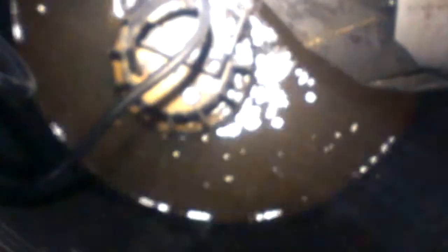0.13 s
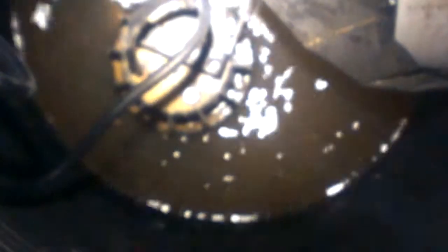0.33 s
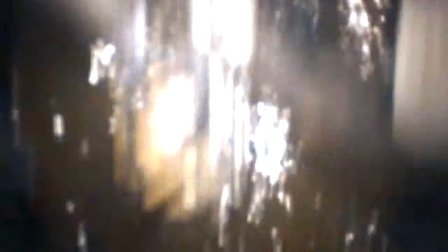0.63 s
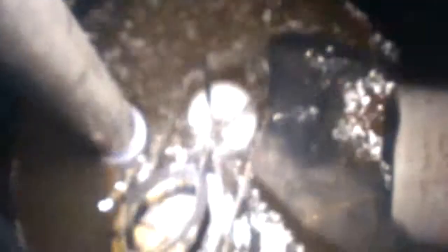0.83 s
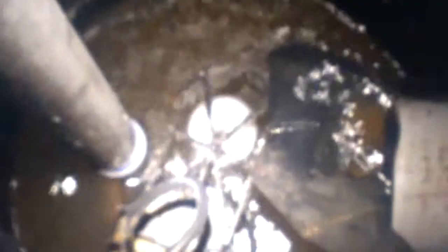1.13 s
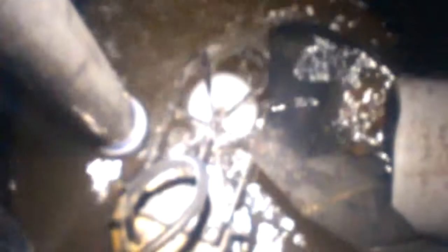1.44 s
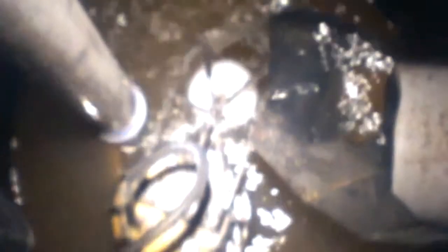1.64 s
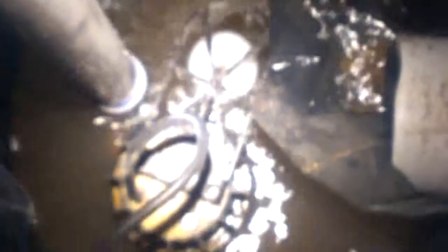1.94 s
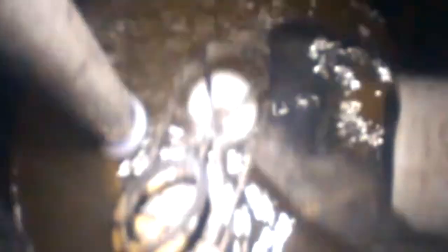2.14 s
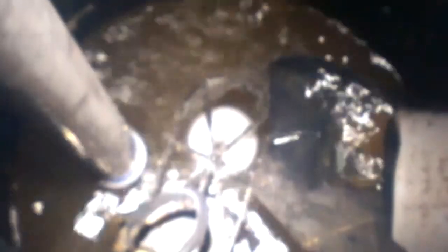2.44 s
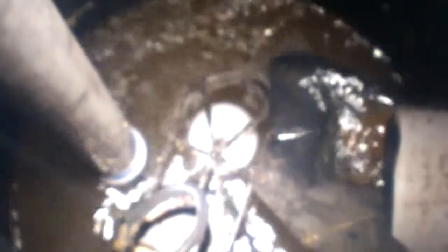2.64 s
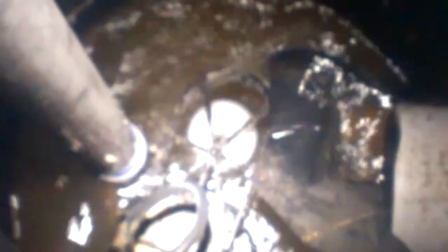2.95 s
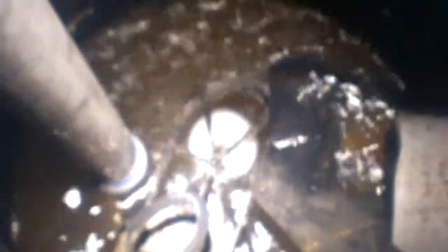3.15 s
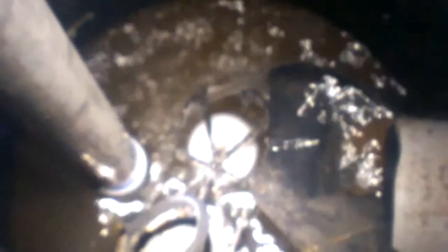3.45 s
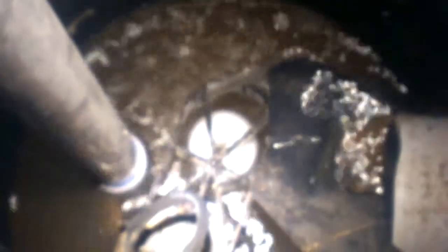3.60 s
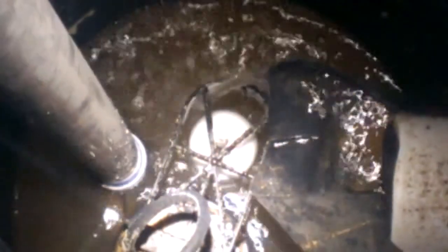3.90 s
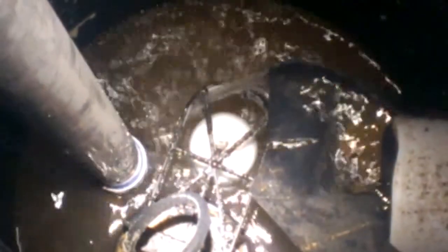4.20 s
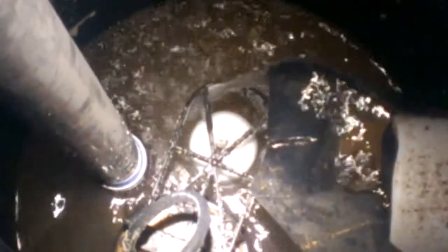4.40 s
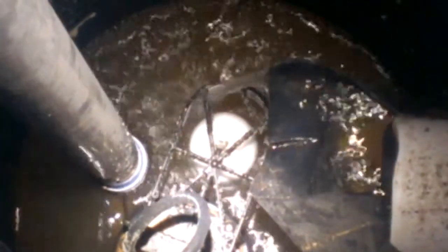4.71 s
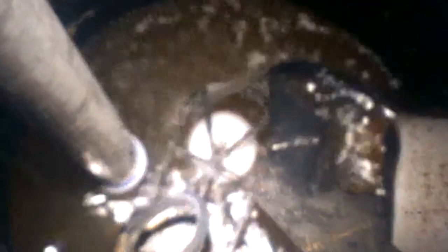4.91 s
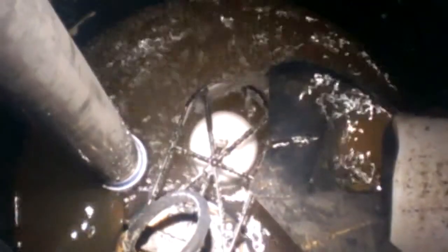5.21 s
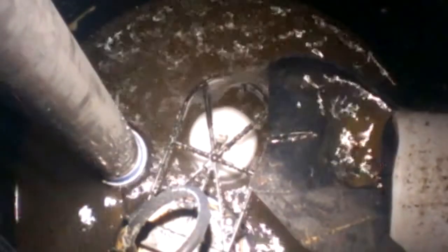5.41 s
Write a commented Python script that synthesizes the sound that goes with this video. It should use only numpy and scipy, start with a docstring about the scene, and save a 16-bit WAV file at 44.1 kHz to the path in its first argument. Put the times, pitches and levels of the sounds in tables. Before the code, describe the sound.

Water trickles and plops into an echoing basement sump pit, with dull thumps and rough handling scuffs during the first two seconds.

```python
"""Water dripping into a basement sump pit

Water trickles from a drain pipe: heavy drops plop and splash, with bubbles that ring and noise for spray.
Air modes and echoes make the pit sing; short bubble sounds, mostly high plinks, dot a fine trickle.
In about the first two seconds dull thumps ring pipe and pit, amid rough rubs and scuffs made of noise,
some from a hand on a camera's case. Behind it all lie soft air noise, a low drone and a faint hum."""
import sys
import numpy as np
from scipy import signal
from scipy.fft import rfft, irfft, next_fast_len
from scipy.io import wavfile
from scipy.ndimage import map_coordinates

SR = 44100
rng = np.random.default_rng(int(sys.argv[2]) if len(sys.argv) > 2 else 0)


def digitize_waveform(pressure):
    """Quantize a signal to 16-bit integers and store it at the path in sys.argv[1].

    Rows of a 2-D input are taken as channels; values are limited to [-1, 1].
    """
    field = np.atleast_2d(pressure).T
    bounded = np.clip(field, -1, 1)
    quanta = np.round(bounded * 32767).astype(np.int16)
    wavfile.write(sys.argv[1], SR, quanta)


N = 245195  # length of the scene in samples
T = np.arange(SR // 4) / SR  # the life of one small event, in seconds

# heavy drops: start_s, plop_hz, gurgle_hz, plop_db, gurgle_db, spray_db
HEAVY_DROPS = [(0.238, 706, 1640, -25.5, -53.5, -82), (0.285, 667, 920, -53, -59, -60.5),
               (0.42, 730, 1790, -54, -59.5, -69), (0.47, 768, 1550, -57, -63, -68),
               (0.69, 735, 1180, -49.5, -81, -67), (0.745, 753, 2010, -57, -64.5, -61),
               (0.841, 744, 1070, -48.5, -63, -65), (1.04, 750, 1570, -45.5, -70, -80),
               (2.08, 670, 1180, -51.5, -66, -84), (2.256, 723, 1190, -52, -61.5, -65),
               (2.415, 674, 990, -56.5, -85, -93), (2.465, 677, 2500, -50.5, -60, -63.5),
               (2.667, 538, 1216, -55, -52, -60.5), (2.77, 715, 1620, -61.5, -57, -67),
               (2.873, 675, 1175, -41, -44, -59.5), (2.912, 760, 1700, -47, -51, -65),
               (3.425, 567, 1810, -49, -50, -68), (3.579, 700, 1580, -52.5, -58.5, -63.5),
               (3.83, 777, 1210, -60.5, -62, -66.5), (3.886, 756, 1110, -47, -51, -67),
               (4.065, 697, 1610, -37.5, -60, -59), (4.1, 683, 1600, -52, -64, -58.5),
               (4.13, 617, 1250, -50.5, -51, -67.5), (4.21, 747, 1250, -54.5, -76, -71),
               (4.245, 532, 1190, -57.5, -69, -84), (4.447, 750, 1700, -43.5, -56, -55.5),
               (4.489, 515, 1710, -60.5, -50.5, -56), (4.66, 628, 1170, -57.5, -97, -79),
               (4.792, 487, 2460, -77, -54.5, -65), (4.84, 644, 1860, -56, -63, -64),
               (5.013, 610, 1270, -48, -65, -79), (5.065, 802, 1240, -51.5, -63, -58.5),
               (5.112, 681, 1670, -48, -48.5, -60.5), (5.168, 688, 1190, -40.5, -59, -59.5),
               (5.195, 660, 2060, -46.5, -69, -64), (5.237, 619, 2120, -45.5, -56.5, -54),
               (5.305, 688, 985, -45, -52.5, -49), (5.413, 732, 1730, -41.5, -54.5, -57)]
# thumps on pipe and pit: start_s, thud_hz, thud_db, clack_db
BLOWS = [(0.538, 152, -36.5, -71), (0.556, 138, -38.5, -49.5), (0.611, 240, -34.5, -53.5),
         (0.645, 247, -47.5, -61), (1.118, 197, -43.5, -59), (1.153, 274, -47, -70),
         (1.276, 280, -43.5, -58), (1.515, 295, -38.5, -45), (1.548, 508, -28, -31), (1.574, 535, -48, -51),
         (1.74, 240, -28, -38.5), (1.762, 365, -33.5, -59), (1.88, 288, -39.5, -52.5),
         (1.894, 283, -36.5, -41), (1.916, 200, -39.5, -54.5), (1.942, 234, -39, -69),
         (2.014, 182, -47, -66)]
# notes of the air in the pit: pitch_hz, relative level_db, time to fade by 60 dB (t60_s)
PIT_MODES = [(502, -2.5, 0.093), (513.5, -4, 0.29), (633.6, -6, 0.12), (713, 0, 0.14), (807, -12, 0.18),
             (1047, -3.5, 0.035), (1134, 0, 0.046), (1222, -6.5, 0.17), (1567, 4.5, 0.053),
             (1657, -11.5, 0.52), (2047, 5, 0.037), (2204, -4, 0.15), (2927, -9, 0.38), (3197, -25, 0.045),
             (4026, -11, 0.3), (4770, -12, 0.42)]
# colour of rubbing skin: frequency_hz, relative level_db per Hz
SKIN_COLOUR = [(59, -33), (100, -13.5), (205, -14), (249, -7.5), (303, -12.5), (421, -7), (740, -13),
               (953, -7), (1180, -9.5), (1640, -1.5), (2070, -5.5), (3000, -10), (4420, -3.5), (5480, -7.5),
               (10400, -18), (13500, -77), (22000, -120)]


def amp(db):
    """Turn decibels into a gain."""
    return 10 ** (np.asarray(db) / 20)


def unit(x):
    """Scale a sound to an rms of 1."""
    return x / np.sqrt(np.mean(x ** 2) + 1e-20)


def along(points, hz):
    """Read values between (frequency, value) points, on a log frequency axis."""
    f, v = np.transpose(points)
    return np.interp(np.log(hz + 1), np.log(f + 1), v)


def curves(rows):
    """Draw one curve over the whole scene for each column after the time."""
    s, *cols = np.transpose(rows)
    return [np.interp(np.arange(N) / SR, s, c) for c in cols]


def wobble(rate):
    """A smooth random curve through so many random points a second."""
    points = rng.standard_normal(int(N * rate / SR) + 4)
    return map_coordinates(points, [np.arange(N) * rate / SR])


def swell(s, attack, length, fade_db_per_s):
    """A gain that rises from time s and starts to fade once its length, counted from s, is over."""
    age = np.arange(N) / SR - s
    return np.clip(age / attack, 0, 1) * amp(-fade_db_per_s * np.maximum(age - length, 0))


def dying(t60, attack):
    """A quick rise with a steady decay, 60 dB in t60 seconds."""
    return amp(-60 * T / t60) * (1 - np.exp(-T / attack))


def filtered(x, response):
    """Filter a sound by a response that depends on frequency."""
    n = x.shape[-1]
    m = next_fast_len(n + 4096, True)
    return irfft(rfft(x, m) * response(np.fft.rfftfreq(m, 1 / SR)), m)[..., :n]


def resonance(f, hz, width):
    """The response of something that rings at one pitch, with a peak gain of 1."""
    return 1j * f * width / (hz * hz - f * f + 1j * f * width)


def spread(pair, spectrum):
    """Colour two unrelated signals and blend them into partly alike sides; the middle has an rms of 1."""
    # how alike left and right are: frequency_hz, likeness (1 = the same)
    likeness = [(60, 0.84), (250, 0.74), (600, 0.33), (1200, 0.14), (3000, 0.38), (10000, 0.37)]

    def middle_and_side(f):
        turn = np.arccos(np.clip(along(likeness, f), -1, 1)) / 2
        return amp(along(spectrum, f)) * np.array([np.cos(turn), np.sin(turn)])

    mid, side = filtered(pair, middle_and_side)
    return np.array([mid + side, mid - side]) / np.sqrt(np.mean(mid ** 2))


def noise(spectrum, size):
    """Stereo noise with a given colour."""
    return spread(rng.standard_normal((2, size)), spectrum)


def add(out, s, db, sound, size):
    """Mix in a sound at time s; db is the rms of its middle over its first size samples."""
    part = out[:, max(0, round(s * SR)):][:, :len(T)]
    head = np.atleast_2d(sound)[:, :size].mean(0)
    gain = amp(db) / np.sqrt(np.mean(head ** 2) + 1e-20)
    part += gain * sound[..., :part.shape[1]]


def pit_answers(count, modes_db, build, scatter_db):
    """Stereo responses of the pit from several spots: wall echoes that build up, and ringing air modes."""
    # how the echoes fade: frequency_hz, time to fade by 60 dB (t60_s)
    echo_fade = [(500, 0.23), (2000, 0.089), (5000, 0.12), (10000, 0.22)]
    hz, level, t60 = np.transpose(PIT_MODES)[:, :, None]
    modes = amp(level - 60 * T / t60) * np.cos(2 * np.pi * hz * T)
    answers = []
    for _ in range(count):
        # almost evenly coloured noise, fading at its own speed in each frequency band
        scatter = noise([(100, 0.027), (10000, 0.011)], len(T))
        f, t, bands = signal.stft(scatter, SR, nperseg=256)
        fading = bands * amp(-60 * t / along(echo_fade, f)[:, None])
        walls = signal.istft(fading, SR, nperseg=256)[1][:, :len(T)]
        walls = walls * (1 - np.exp(-T / build))
        walls = walls / np.linalg.norm(walls[0])
        # the echoes are weaker around 750 Hz
        walls = filtered(walls, lambda f: amp(along([(500, 0.0), (750, -10.0), (1100, 0.5)], f)))
        strengths = amp(modes_db + rng.normal(0, scatter_db, len(PIT_MODES)))
        answers.append(walls + strengths @ modes)
    return answers


def ring(x, answer):
    """A sound as it comes out of the pit."""
    return signal.fftconvolve(np.atleast_2d(x), answer, axes=1)[:, :x.shape[-1]]


def bubble(hz, cycles, rise):
    """A trapped bubble fades by 60 dB over some cycles; its pitch climbs as it nears the surface."""
    age = np.minimum(T * hz / cycles, 4)
    pitch = hz * (1 + rise * (np.minimum(age, 1) - 1 / 4))
    envelope = amp(-60 * age ** 1.61) * (1 - np.exp(-T * hz))
    return envelope * np.sin(2 * np.pi * np.cumsum(pitch) / SR)


def cluster(hz, cycles, rise, later_db, count):
    """A bubble, followed within a few hundredths of a second by weaker ones of like size."""
    out = bubble(hz, cycles, rise)
    for size, wait in rng.random((count, 2)):
        follower = bubble(hz * 2 ** (0.7 * (size - .5)), cycles, rise)
        out = out + amp(later_db) * np.interp(T - .006 - 0.033 * wait, T, follower, left=0)
    return out


def splash():
    """A drop breaks the surface in short noise bursts: a smack, a higher crackle and a fine spray."""
    # colour of the spray: frequency_hz, relative level_db per Hz
    spray_colour = [(2000, -22), (5000, -9.5), (6500, -16), (7900, -9.5), (10400, -19)]
    burst = rng.standard_normal((3, len(T))) * dying(t60=0.07, attack=.0016)
    smack = filtered(burst[0], lambda f: resonance(f, 1880, 920) ** 2)
    crackle = filtered(burst[1], lambda f: resonance(f, 3040, 1940) ** 2)
    spray = filtered(burst[2], lambda f: amp(along(spray_colour, f)))
    return smack, crackle, spray


def cellar(air_db):
    """The still air of the basement, a low drone that booms under two thumps, and a faint, wavering hum."""
    # faint mains hum: pitch_hz, level_db
    hum_tones = [(120, -77.5), (241, -73), (399, -74)]
    # deep booms under two of the low thumps: start_s, level_db
    boom_times = [(0.545, -39), (1.91, -52)]
    # colour of the basement air: frequency_hz, relative level_db per Hz
    air_colour = [(25, -10), (45, -13), (130, -5.5), (250, -4), (430, -7.5), (700, -10), (1000, -14.5),
                  (2500, -13), (4700, -18.5), (6300, -18), (10400, -21.5)]
    drone_colour = [(25, -54), (40, -13.5), (54, 3.5), (75, -12.0), (150, -4.0), (300, -63), (1000, -91)]
    drone_db = -67
    t = np.arange(N) / SR
    hum = 0
    for hz, db in hum_tones:
        level = amp(db + 0.48 * wobble(2.2))
        hum = hum + level * np.sin(2 * np.pi * hz * t + wobble(2.126))
    booms = sum(amp(db) * swell(s, attack=.012, length=0.027, fade_db_per_s=204) for s, db in boom_times)
    drone = (amp(drone_db + 1.5 * wobble(11)) + booms) * noise(drone_colour, N)
    return amp(air_db) * noise(air_colour, N) + drone + hum


def hand(grain_db):
    """Rough noise in short rubs and scuffs, over a creeping grip: skin sticks and slips on a camera's case."""
    # rough rubs and scuffs: start_s, attack_s, length_s, level_db
    rubs = [(0.515, 0.05, 0.062, -53), (0.597, 0.013, 0.012, -43), (0.907, 0.01, .022, -39.5),
            (0.928, 0.027, 0.094, -27), (1.122, 0.041, 0.045, -47), (1.273, 0.0055, 0.054, -35.5),
            (1.333, 0.023, 0.029, -41.5)]
    rub_fade_db_per_s = 271
    touch_s, touch_db = .02, -12  # a softer brush comes just before each rub or scuff
    # the grip creeps faintly underneath
    level = amp(-60) * swell(0.83, attack=.1, length=1.0, fade_db_per_s=25)
    for s, attack, length, db in rubs:
        touch = amp(touch_db) * swell(s - touch_s, touch_s, touch_s, rub_fade_db_per_s)
        rub = swell(s, attack, length, rub_fade_db_per_s)
        level = np.hypot(level, amp(db) * (touch + rub))
    # fast wobbles in level roughen the noise
    slips = rng.standard_normal((2, N)) * amp(grain_db * wobble(1400))
    return level * amp(0.27 * wobble(38.76)) * spread(slips, SKIN_COLOUR)


def rumble():
    """Every thump leaves a low noise that fades, and piles up when thumps come close together."""
    # colour of the rumble: frequency_hz, relative level_db per Hz
    rumble_colour = [(25, -28), (55, -8), (90, -14.5), (170, -0.5), (320, -2.5), (480, -9), (800, -13.5),
                     (1600, -23), (3000, -30)]
    rumble_db = -51.5
    power = sum(swell(s, attack=0.005, length=0.01, fade_db_per_s=70) ** 2 for s, *_ in BLOWS)
    return np.sqrt(power) * amp(rumble_db + 2.15 * wobble(29.62)) * noise(rumble_colour, N)


def thumps(scatter_db):
    """Soft blows ring pipe and pit: a swelling low thud, a clack in the upper modes and a scuff."""
    # what the thumps ring with: pitch_hz, relative level_db, time to fade by 60 dB (t60_s)
    body_modes = [(185.7, -0.5, 0.089), (269, -3.5, 0.088), (307.7, -3.5, 0.13), (372.4, 11, 0.037),
                  (512, -0.5, 0.095), (810, -9.5, 0.2), (925, 4.5, 0.11), (1140, -30, 0.041),
                  (1260, 5.5, 0.073), (1478, 1, 0.043), (1590, 2, 0.061), (1666, 7.5, 0.025),
                  (1860, -11, 0.15), (2350, -8, .06), (2970, -25, 0.068)]
    scuff_db, scuff_lead_s = -54, .008  # a scuff leads into every thump
    out, head = np.zeros((2, N)), SR // 40
    hz, level, t60 = np.transpose(body_modes)[:, :, None]
    low = hz < 700  # the thud has the modes below this, the clack those above
    for s, thud_hz, thud_db, clack_db in BLOWS:
        phase = 2 * np.pi * rng.random(hz.shape)
        mode_db = level + rng.normal(0, scatter_db, hz.shape) - 60 * T / t60
        modes = amp(mode_db) * np.sin(2 * np.pi * hz * T + phase)
        # the blow feeds the low modes near its own pitch most
        closeness = 1 / (1 + (np.log2(hz / thud_hz) / 0.41) ** 2)
        thud = (modes * low * closeness).sum(0) * (1 - np.exp(-T / 0.013))
        chatter = noise([(100, 0), (10000, 0.0082)], len(T)) * dying(t60=0.18, attack=0.00097)
        shove = filtered(chatter, lambda f: resonance(f, thud_hz, 240) / (1 + (f / (2 * thud_hz)) ** 4))
        rattle = filtered(chatter, lambda f: resonance(f, 1140, 1020) ** 2)
        upper = (modes * ~low).sum(0) * (1 - np.exp(-T / 0.001))
        scuff = noise(SKIN_COLOUR, len(T)) * dying(t60=0.085, attack=0.0055)
        add(out, s, thud_db, unit(thud) + 0.37 * unit(shove), size=head)
        add(out, s, clack_db, unit(upper) + 0.91 * unit(rattle), size=head)
        add(out, s - scuff_lead_s, scuff_db, scuff, size=head)
    return out


def hollow():
    """Heavy drops leave the water churning; this noise keeps three low air modes of the pit singing."""
    calm_db = -70.5  # the hollow note between drops
    hollow_db, middling_plop_db = -60, -50  # the hollow note after a drop with a middling plop
    growth = 0.13  # dB of hollow note per dB of plop
    power = amp(calm_db) ** 2
    for s, _, _, plop_db, *_ in HEAVY_DROPS:
        strength = amp(hollow_db + growth * (plop_db - middling_plop_db))
        churn = swell(s, attack=0.025, length=0.035, fade_db_per_s=120)
        power = power + (strength * churn) ** 2

    def modes(f):
        # 6.1 / t60 is the width in Hz
        return sum(amp(db) * resonance(f, hz, 6.1 / t60) ** 2 for hz, db, t60 in PIT_MODES[1:4])

    return np.sqrt(power) * unit(filtered(rng.standard_normal(N), modes))


def trickle(count, spread_db):
    """Little bubbles of many sizes keep the pit ringing between the drops; most are tiny and brief."""
    # strength of the stream, heard as the level of its trickle: time_s, level_db
    stream = [(0, -57), (.3, -61), (.8, -59), (1.3, -62), (1.6, -60.5), (2.0, -54), (2.35, -63),
              (2.75, -53.5), (3.05, -62.5), (3.3, -58), (3.6, -57.5), (3.95, -60.5), (4.2, -57.5),
              (4.55, -56.5), (4.75, -65), (4.98, -63), (5.2, -59), (5.56, -62)]
    # colour of the trickle: frequency_hz, relative level_db per Hz
    fizz_colour = [(300, -23), (520, -5.5), (720, -4.5), (950, -4), (1600, -7.5), (2400, -10), (3200, -8.5),
                   (4700, -4.5), (5600, -1), (6400, -20.5), (8000, -1.5), (10400, -3)]
    out = np.zeros((2, N))
    spots = pit_answers(count=8, modes_db=-41, build=0.002, scatter_db=3)
    pitches_hz = [500, 850, 2500, 5400, 8600]
    for k, (when, share, size, life) in enumerate(rng.random((count, 4))):
        hz = np.exp(np.interp(share, [0, .22, .45, .95, 1], np.log(pitches_hz)))
        blip = bubble(hz, cycles=3 + 16 * life ** 2, rise=0.031)
        start_s = (k + when) / count * N / SR
        add(out, start_s, spread_db * size, ring(blip, spots[k % len(spots)]), size=SR // 30)
    fizz = unit(filtered(out, lambda f: amp(along(fizz_colour, f))))
    return amp(curves(stream)[0]) * fizz


def droplets():
    """A light droplet traps only a few bubbles, which mostly plink, and throws a little spray."""
    # short bubble sounds, mostly high plinks, each with a little spray: start_s, pitch_hz, level_db
    bubble_sounds = [(0.01, 3150, -58.5), (0.191, 2830, -59), (0.238, 2830, -54.5), (0.392, 1900, -54.5),
                     (1.474, 4850, -54.5), (1.513, 4700, -52), (1.623, 4500, -53.5), (2.212, 1230, -59.5),
                     (2.318, 3470, -43), (2.506, 1160, -55.5), (3.03, 4200, -60.5), (3.11, 4370, -55),
                     (3.201, 4270, -54.5), (3.383, 3500, -56), (3.486, 2770, -60), (3.629, 5500, -56.5),
                     (3.737, 4480, -51), (3.79, 4860, -55.5), (4.02, 3100, -64.5), (4.169, 5200, -53),
                     (4.356, 3440, -60), (4.492, 3310, -48.5), (4.568, 3930, -64.5), (4.62, 3670, -63.5),
                     (4.795, 4680, -49.5), (5.207, 4100, -51.5), (5.378, 2090, -53.5), (5.411, 3050, -51)]
    droplet_spray_db = -68
    out, head = np.zeros((2, N)), 35 * SR // 1000
    spots = pit_answers(count=len(bubble_sounds), modes_db=-46, build=0.0014, scatter_db=3)
    for (s, hz, db), spot in zip(bubble_sounds, spots):
        _, crackle, spray = splash()
        bubbles = cluster(hz, cycles=18, rise=0.023, later_db=-11.5, count=3) + 0.42 * crackle
        add(out, s, db, ring(bubbles, spot), size=head)
        add(out, s, droplet_spray_db, ring(spray, spot), size=head)
    return out


def drops():
    """Each heavy drop smacks the surface, traps large, middling and small bubbles, and throws spray."""
    # harder splashes trap larger small bubbles: spray_db, plink_hz
    plink_pitch = [(-54.5, 4370), (-51, 3030)]
    plink_over_spray_db = 1  # a drop's small bubbles come with its spray
    out, head = np.zeros((2, N)), 35 * SR // 1000
    spots = pit_answers(count=len(HEAVY_DROPS), modes_db=-44, build=0.001, scatter_db=2.0)
    for (s, plop_hz, gurgle_hz, plop_db, gurgle_db, spray_db), spot in zip(HEAVY_DROPS, spots):
        smack, crackle, spray = splash()
        # the loudest plops come from deep bubbles, which ring longest
        plop = bubble(plop_hz, cycles=np.interp(plop_db, [-50, -26], [18, 42]), rise=0.017)
        gurgle = cluster(gurgle_hz, cycles=11.7, rise=0.066, later_db=-9.5, count=4) + 0.98 * smack
        plink_hz = np.interp(spray_db, *np.transpose(plink_pitch))
        plink = cluster(plink_hz, cycles=14, rise=0.016, later_db=-6.5, count=3) + 0.28 * crackle
        add(out, s, plop_db, ring(plop, spot), size=head)
        add(out, s, gurgle_db, ring(gurgle, spot), size=head)
        add(out, s, spray_db + plink_over_spray_db, ring(plink, spot), size=head)
        add(out, s, spray_db, ring(spray, spot), size=head)
    return out


def scene():
    """The room, the rubs and scuffs, the thumps and the water in the pit."""
    background = cellar(air_db=-64.5) + hand(grain_db=0.5)
    knocks = rumble() + thumps(scatter_db=7)
    water = hollow() + trickle(count=950, spread_db=13.5) + droplets() + drops()
    return background + knocks + water


def record(dry):
    """Two microphone ports each colour their side; nothing is kept from the band limit up."""
    # how the ports differ in colour: frequency_hz, left minus right difference_db
    port_colour = [(200, -.5), (400, 1), (510, 4.5), (720, 4), (980, -0.5), (1450, -9), (1900, -2),
                   (2300, 2.5), (2650, 3.5), (3300, 6.5), (4200, 1.5), (5400, -3), (7200, -1.5),
                   (8500, -2.5)]
    top_hz = 10580

    def ports(f):
        # each side takes half of the difference
        return amp(np.outer([.5, -.5], along(port_colour, f))) * (f < top_hz)

    return filtered(dry, ports)


dry = scene()
out = record(dry)
digitize_waveform(out)
```